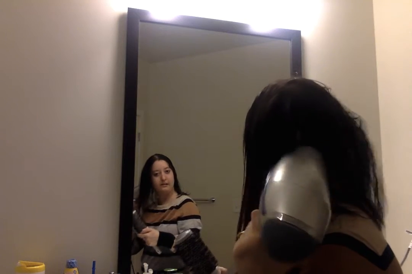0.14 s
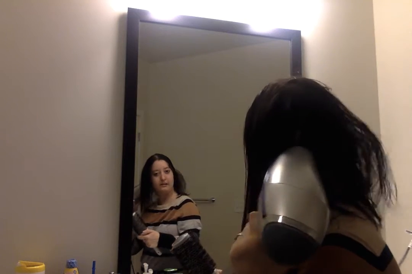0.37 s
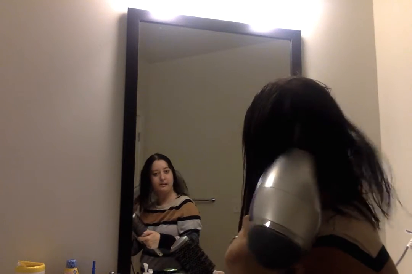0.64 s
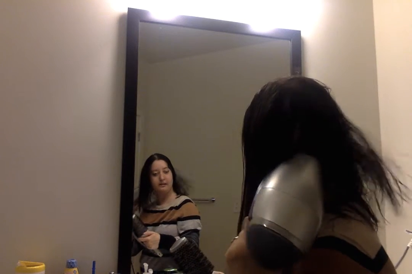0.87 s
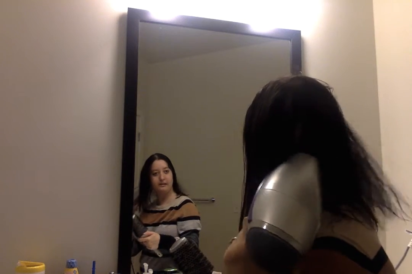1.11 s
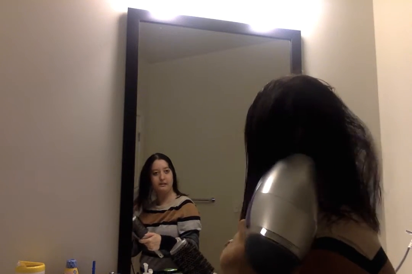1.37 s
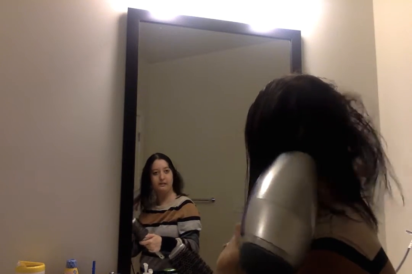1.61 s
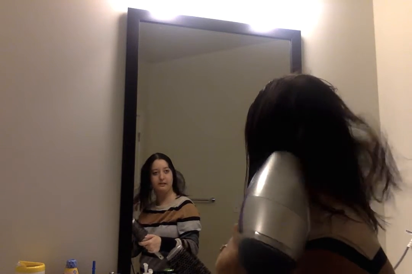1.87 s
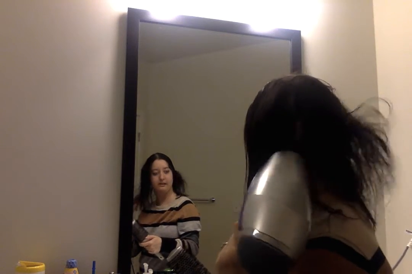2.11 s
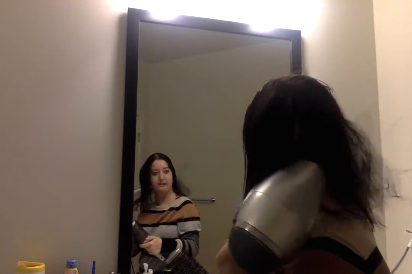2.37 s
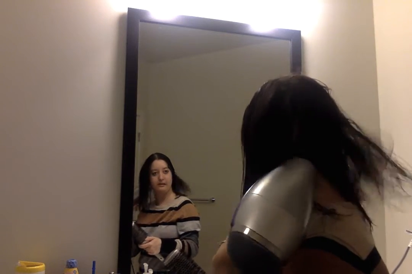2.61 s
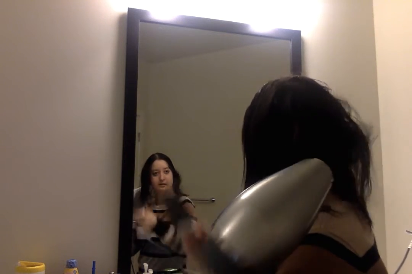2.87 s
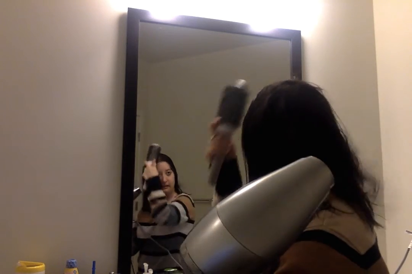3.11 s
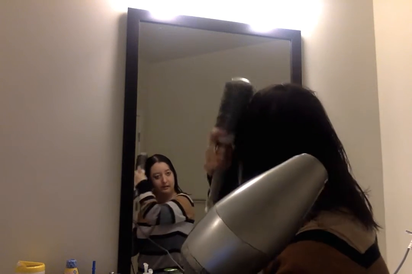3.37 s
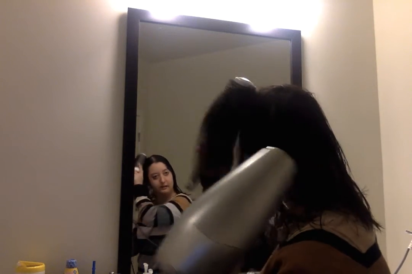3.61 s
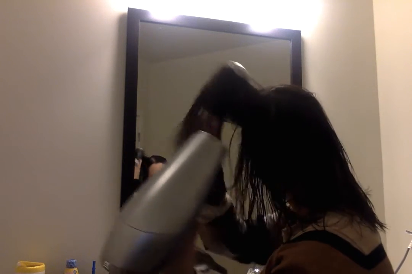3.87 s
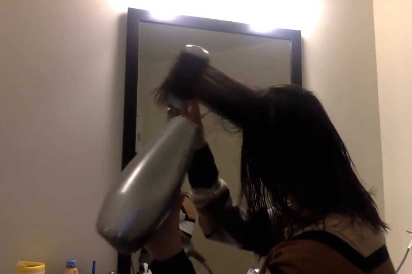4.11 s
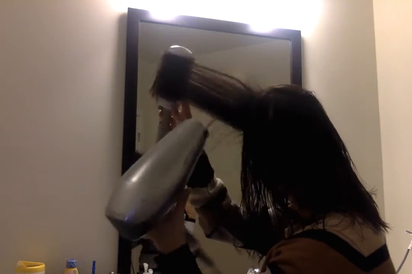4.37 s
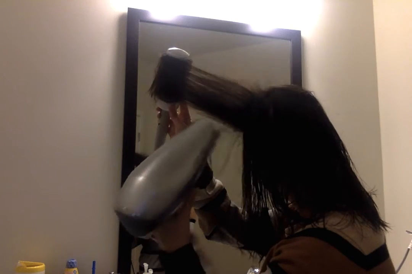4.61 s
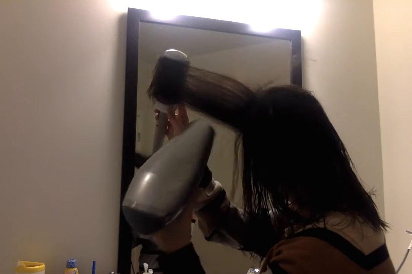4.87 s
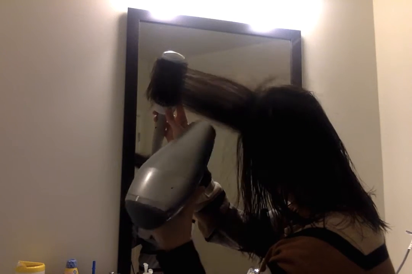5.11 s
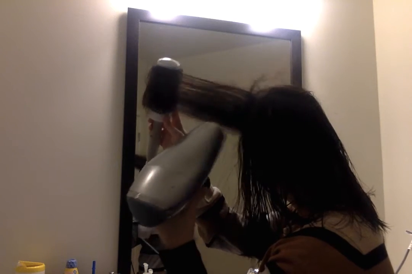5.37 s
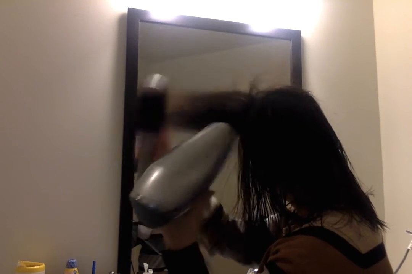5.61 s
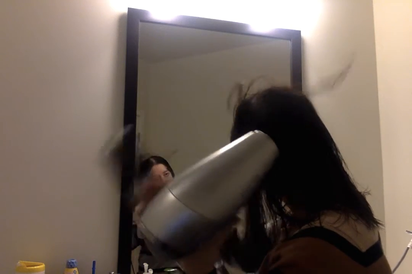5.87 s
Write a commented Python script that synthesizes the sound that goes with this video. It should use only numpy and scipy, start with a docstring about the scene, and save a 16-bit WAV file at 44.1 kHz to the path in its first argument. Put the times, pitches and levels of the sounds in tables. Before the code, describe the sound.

A hair dryer is already running at the start and never stops. Its dense, hissy air rush stays nearly level, with a faint fluttering whine underneath. Around three seconds it swings sideways, the rush lifts and the whine stands out for about a second, then recedes; near the end the motor pitch sinks slightly. Close microphone in a small hard bathroom.

```python
"""A hand-held hair dryer runs close to a small microphone in a bathroom and is moved about the head.
Its air is shaped noise, coloured by peaks and dips and tilted by where the nozzle points.
The motor is a stack of sines on multiples of the shaft speed, led by a whine at eight times that speed;
it throbs with the mains and sags near the end as hair and brush block the air.
The hard room lifts and cancels narrow low bands of the rush."""
import sys
import numpy as np
from scipy import signal
from scipy.fft import rfft, irfft, next_fast_len
from scipy.io import wavfile
from scipy.ndimage import uniform_filter1d

SR = 44100
rng = np.random.default_rng(int(sys.argv[2]) if len(sys.argv) > 2 else 0)


def volts(x):
    """Linear amplitude factor 10**(x/20) for a level x in dB, scalar or array-like."""
    e = np.asarray(x, float) / 20
    return 10 ** e


def wav_record(signal):
    """Record a signal, one row per channel, as 16-bit PCM in the file named by sys.argv[1]."""
    frames = np.transpose(np.atleast_2d(signal))
    bounded = np.clip(frames, -1, 1)
    # unit amplitude maps onto the largest positive 16-bit level
    quanta = np.round(bounded * 32767).astype(np.int16)
    wavfile.write(sys.argv[1], SR, quanta)


N = 263718
FRAME, HOP = 2048, 512  # samples, for the noise spectrum
MAINS_HZ = 60

# how far the dryer has swung side-on to the microphone: time_s, side_on (0-1)
SIDE_ON = [(0, 0.07), (1, 0.12), (2, 0), (2.8, 0.1), (3.2, 0.7), (3.6, 0.84), (4.3, 0.65), (5, 0.57),
           (5.5, 0.77), (5.98, 0.9)]


def evened(x):
    """Scales to rms 1."""
    return x / np.sqrt(np.mean(x ** 2) + 1e-20)


def read(points, hz):
    """A spectrum joined by straight lines on a log frequency axis."""
    point_hz, value = np.transpose(points)
    return np.interp(np.log(hz + 1), np.log(point_hz + 1), value)


def humps(modes, hz):
    """Sum of humps and dips in dB, each falling to half its dB at the edges of its width."""
    return sum(db / (1 + (2 * (hz - centre_hz) / width_hz) ** 2) for centre_hz, width_hz, db in modes)


def humps_by_aim(modes, hz):
    """Hump curves in dB with the dryer behind the head and with it at the side."""
    modes = np.array(modes)
    return humps(modes[:, [0, 1, 2]], hz), humps(modes[:, [0, 1, 3]], hz)


def wander(t, slow_hz, fast_hz):
    """Smooth random drift of rms 1: sines of random phase, the slower ones stronger."""
    coarse = np.arange(0, t[-1] + 1, 1 / 400)
    rates = np.geomspace(slow_hz, fast_hz, num=24)
    cycles = np.outer(coarse, rates) + rng.random(len(rates))
    waves = np.sin(2 * np.pi * cycles) / np.sqrt(rates)
    return np.interp(t, coarse, evened(waves.sum(axis=1)))


def side_on_at(t):
    """Swing of the dryer: 0 is behind the head, 1 fully side-on."""
    return np.clip(np.interp(t, *np.transpose(SIDE_ON)), 0, 1)


def room(x):
    """Standing waves lift and cancel narrow low bands; the pattern changes with the place of the dryer."""
    # peaks and nulls at the microphone: centre_hz, width_hz, behind_db, side_db
    room_modes = [(60, 6, 5, 5), (222, 25, -2, -1), (255, 10, -4, -3), (268, 8, 4, 3), (295, 12, 9, 11),
                  (318, 12, 5, 1), (355, 25, 3, 5), (378, 14, 4, 4), (398, 14, -6, -4), (417, 14, 5, 5),
                  (436, 9, 10, 8), (470, 22, -4, -2), (505, 30, -4, -3), (550, 12, -4, -2), (575, 40, 4, 2),
                  (605, 14, 2, 3), (660, 35, -5, -3), (686, 14, 5, 3), (702, 14, -4, -5), (725, 30, 3, 1),
                  (765, 14, 4, 11), (778, 12, -3, 0), (815, 12, -3, 0), (860, 16, 5, 5), (897, 18, -3, -4),
                  (940, 20, 4, 2), (987, 12, 5, 2), (1045, 30, 3, 3), (1100, 30, -5, -1), (1132, 16, 3, 0),
                  (1178, 22, 4, 3), (1238, 20, -4, 0)]
    size = next_fast_len(N + SR)
    hz, spectrum = np.fft.rfftfreq(size, 1 / SR), rfft(x, size)
    behind, side = (irfft(spectrum * volts(db), size)[:N] for db in humps_by_aim(room_modes, hz))
    side_on = side_on_at(np.arange(N) / SR)
    return (1 - side_on) * behind + side_on * side


def shaft_angle(waver=0.0009):
    """Angle of the motor shaft in radians, its speed trembling by waver (rms fraction)."""
    # speed before the tremble: time_s, shaft_hz
    shaft_speed = [(0, 207), (.8, 207.2), (1.05, 208.4), (1.45, 209.6), (1.9, 208.7), (2.6, 208.6),
                   (3.5, 209), (4.2, 208.2), (4.7, 207.2), (5.0, 205.3), (5.2, 202.8), (5.5, 200.2),
                   (5.98, 199.3)]
    t = np.arange(N) / SR
    shaft_hz = np.interp(t, *np.transpose(shaft_speed)) * (1 + waver * wander(t, 3.2, 40))
    return 2 * np.pi * np.cumsum(shaft_hz) / SR


def swelling(t, tone, resting_db):
    """Gain of a tone: its resting power plus a smooth arch for each swell."""
    # a tone swells while the moving dryer lines up its reflections: middle_s, length_s, peak_db, tone
    swells = [(0.02, 0.19, -56, "whine"), (0.235, 0.11, -54.5, "whine"), (0.457, .14, -62, "whine"),
              (0.683, 0.14, -54.5, "whine"), (1.084, 0.12, -54, "whine"), (1.42, .25, -60, "whine"),
              (1.604, 0.15, -53, "whine"), (1.803, 0.18, -59, "whine"), (2.18, 0.16, -61, "whine"),
              (4.783, .12, -55.5, "whine"), (4.95, 0.072, -54, "whine"), (5.073, .12, -58, "whine"),
              (5.153, 0.22, -53.5, "whine"), (5.35, 0.1, -57.5, "whine"), (5.58, 0.082, -62, "whine"),
              (5.7, .14, -59.5, "whine"), (0.01, 0.21, -57.5, "octave"), (.25, .12, -63, "octave"),
              (0.556, 0.4, -59.5, "octave"), (.8, 0.17, -61, "octave"), (1.044, 0.34, -53, "octave"),
              (1.34, .2, -53.5, "octave"), (1.75, 0.14, -58, "octave"), (1.925, 0.14, -57, "octave"),
              (2.41, 1.07, -55.5, "octave"), (2.356, 0.068, -50.5, "octave"),
              (2.986, 0.098, -53.5, "octave"), (3.35, 0.71, -62, "octave"), (3.955, 0.15, -53, "octave"),
              (4.244, 0.12, -57, "octave"), (4.545, .4, -60, "octave"), (4.85, .4, -66, "octave"),
              (5.25, .3, -66, "octave"), (5.393, 0.083, -57, "octave"), (5.465, 0.13, -59, "octave"),
              (5.8, 0.6, -62.5, "octave"), (.35, 1.06, -68, "hum"), (0.965, 0.28, -67.5, "hum"),
              (2.5, 0.8, -73.5, "hum"), (3.35, 0.95, -73, "hum"), (4.0, 0.91, -70.5, "hum"),
              (4.65, 1, -79.5, "hum"), (5.245, 0.57, -72, "hum"), (5.753, .6, -76, "hum"),
              (0.122, 0.11, -58, "whistle"), (0.452, 1.6, -66.5, "whistle"), (1.25, 0.23, -62, "whistle"),
              (.55, .2, -62, "whistle"), (1.55, 0.65, -68, "whistle"), (2.35, 0.84, -67, "whistle"),
              (3.06, .1, -61, "whistle"), (3.33, 0.74, -62, "whistle"), (3.75, .15, -65, "whistle"),
              (4.1, .2, -65, "whistle"), (4.8, 1.2, -68, "whistle"), (.25, 0.59, -74, "low hum"),
              (1.1, .8, -75, "low hum"), (2.45, 1.2, -69.5, "low hum")]
    power = volts(resting_db + 0 * t) ** 2
    for middle_s, length_s, peak_db, name in swells:
        if name == tone:
            place = np.clip((t - middle_s) / length_s, -0.5, 0.5)
            power = power + (volts(peak_db) * np.cos(np.pi * place)) ** 2
    return np.sqrt(power)


def motor(angle, flutter_db=1.8, fade_db=2.5, steady_db=-57.5):
    """Sines on shaft multiples; mains ripple gives side tones, moving through room reflections fades them."""
    # whine between swells, strongest when the intake faces the microphone: time_s, level_db
    whine_level = [(0, -64), (.5, -61), (1.5, -62.5), (2.3, -61.5), (2.74, -65.5), (2.84, -57), (2.95, -55),
                   (3.06, -51), (3.13, -46), (3.24, -50.5), (3.37, -47), (3.5, -48.5), (3.75, -50),
                   (4.08, -46.5), (4.2, -56.5), (4.52, -69.5), (4.75, -60.5), (5.0, -59.5), (5.5, -63.5),
                   (5.98, -62.5)]
    # the other main tones between swells: name to level_db
    resting_levels = {"octave": -66, "hum": -84, "whistle": -78, "low hum": -82}
    # whine, octave, hum, whistle and low hum: multiple of shaft speed
    main_multiples = [8, 16, 3, 24, 4]
    # the same five: strength of each mains side tone (share of the tone)
    main_throb = [.04, .15, .02, .3, .02]
    # the same five: chance fading when weak (rms dB)
    main_fade = [2.4, 2.2, 1, 1.2, 1]
    # weaker tones: shaft_multiple, level_db, side_tone_share, share of the whine's slow swell
    shaft_tones = [(1, -84.5, 0, -0.1), (2, -82.5, 0.8, 0.34), (7, -72.5, 0, -1.2), (9, -77, 0.3, 0.9),
                   (12, -69.5, 0, 0.25), (28, -90, 0.5, -0.44), (32, -81.5, 1, 0.63), (35, -83, 0, 0.83),
                   (36, -90, 0.7, .2), (40, -85, 0.1, -0.45), (43, -99, 0, 0.2), (44, -89, 0.3, 0.71),
                   (48, -95, 0.1, -0.53), (52, -87, .2, .8), (56, -89, 0.6, -0.8), (60, -101, 0, 0.6),
                   (64, -100, 0.3, 0.31)]

    t = np.arange(N) / SR
    mains = np.cos(2 * np.pi * MAINS_HZ * t)
    whine_db = np.interp(t, *np.transpose(whine_level))
    levels = [swelling(t, "whine", whine_db)]
    levels += [swelling(t, name, db) for name, db in resting_levels.items()]
    out = np.zeros(N)
    for multiple, level, throb, tone_fade_db in zip(main_multiples, levels, main_throb, main_fade):
        # a tone louder than steady_db comes straight from the dryer and hardly fades
        reflected = 1 / (1 + (level / volts(steady_db)) ** 2)
        flutter = flutter_db * wander(t, 9.0, 65)
        fading = tone_fade_db * reflected * wander(t, 3.6, 12)
        out += level * volts(flutter + fading) * (1 + 2 * throb * mains) * np.sin(multiple * angle)

    # weaker tones follow the facing of the intake by their own share
    facing_db = uniform_filter1d(whine_db, size=SR // 2) - np.mean(whine_db)
    for multiple, db, throb, follow in shaft_tones:
        gain = volts(db + follow * facing_db + fade_db * wander(t, 0.81, 13))
        phase = 2 * np.pi * rng.random()
        out += gain * (1 + 2 * throb * mains) * np.sin(multiple * angle + phase)
    return np.sqrt(2) * out  # levels are rms


def swing_ridge(t, hz):
    """Lift in dB: in the swing a reflection raises one ridge, sliding down as its path grows."""
    # start_s (the ridge begins half a frame later), length_s, from_hz, to_hz, width_hz, lift_db
    ridge = (2.83, .45, 1140, 540, 100, 6)
    start_s, length_s, from_hz, to_hz, width_hz, lift_db = ridge
    done = np.clip((t - FRAME / 2 / SR - start_s) / length_s, 0, 1)
    centre_hz = from_hz + (to_hz - from_hz) * done
    return lift_db * np.sin(np.pi * done) / (1 + (2 * (hz[:, None] - centre_hz) / width_hz) ** 2)


def rush_colour(side_on, hz):
    """Gain, frequency by time, of the rush: a broad spectrum with narrower peaks and dips."""
    # rush before the peaks and dips: freq_hz, relative density_db
    rush_spectrum = [(24, -70), (60, -49), (150, -25), (190, -25.5), (205, -16.5), (500, -17.5), (700, -13),
                     (1500, -11), (3000, -14), (5700, -12.5), (7150, -21), (9900, -20), (12900, -27.5),
                     (15700, -35)]
    # peaks and dips in the colour of the rush: centre_hz, width_hz, behind_db, side_db
    peaks_and_dips = [(650, 120, -1, 5.5), (1383, 213, 6, 6.5), (2013, 340, 8, 8), (2714, 218, 7, 6),
                      (2610, 108, 5, 0.5), (3330, 340, 2.5, 6.5), (3970, 1540, 7.5, 4.5),
                      (4600, 250, -3, 0.5), (4880, 210, -2, 2.5), (5690, 92, 0.5, 5.5),
                      (6674, 51, 9.5, 7.5), (7160, 310, -2.5, -1), (8250, 550, 5, -2), (9930, 620, 6, -4.5),
                      (11570, 260, 6, 0.5), (12600, 270, -1, 5), (12950, 460, -9, -2), (13300, 400, 6, 2),
                      (14000, 500, 5, 4), (14650, 300, -4, 2), (15150, 500, -1, 7)]
    behind_db, side_db = (db[:, None] for db in humps_by_aim(peaks_and_dips, hz))
    colour = volts(read(rush_spectrum, hz)[:, None] + (1 - side_on) * behind_db + side_on * side_db)
    middle = (hz > 1800) & (hz < 3150)  # this band keeps a constant power
    return colour / np.sqrt(4 * np.sum(colour[middle] ** 2, axis=0) / 3)


def aim_tilt(side_on, rush_db, hz, near_db=-50):
    """Tilt in dB, frequency by time, from where the nozzle points and how near it is."""
    # rumble, roar, rush, jet hiss, fizz, finest fizz:
    # centre_hz, behind_db, side_db (both at a rush of near_db), dB lost for each dB the rush gains
    aim = [(150, -1, -4.5, 2), (704, 0, -4, 1), (2330, 0, -1, 0), (4900, 1.66, -2.2, 0.17),
           (9140, 0.1, 1.7, 0.57), (13400, -1, -3.5, 0.8)]
    centre_hz, behind_db, side_db, lost = np.transpose(aim)[:, :, None]
    log_centres = np.log(centre_hz[:, 0])
    shares = np.array([np.interp(np.log(hz + 1), log_centres, row) for row in np.eye(len(aim))])
    return shares.T @ ((1 - side_on) * behind_db + side_on * side_db - lost * (rush_db - near_db))


def air(angle, patchy_db=0.5, ripple_db=2.0, gust_db=0.04, throb=0.011, chop=0.016, fizz_db=0.7, fizz_hz=9000):
    """Turbulent rush: noise shaped frame by frame and pulsed by mains and fan."""
    # nearness of the nozzle: time_s, relative rush level_db
    nearness = [(0, -51), (.5, -50.5), (1.3, -50), (2.3, -50), (2.9, -50), (3.25, -47.5), (3.75, -49),
                (4.05, -50), (4.8, -51), (5.3, -52), (5.98, -51.5)]
    frames, hz = N // HOP + 5, np.fft.rfftfreq(FRAME, 1 / SR)
    t = np.arange(frames) * HOP / SR
    real, imag, patches, ripple = rng.standard_normal((frames, len(hz), 4)).T
    patches = evened(uniform_filter1d(uniform_filter1d(patches, size=20, axis=0), size=7, axis=1))
    # reflections interfere in narrow ridges that shift slowly
    ripple = evened(uniform_filter1d(uniform_filter1d(ripple, size=2, axis=0), size=60, axis=1))

    rush_db = np.interp(t, *np.transpose(nearness))
    side_on = side_on_at(t)
    shape_db = aim_tilt(side_on, rush_db, hz) + patchy_db * patches + ripple_db * ripple
    shape_db += rush_db + swing_ridge(t, hz)
    # the hiss above about 9 kHz wavers a little at random, 3 to 12 times a second
    shape_db += fizz_db * wander(t, 3.0, 12) / (1 + (fizz_hz / (hz[:, None] + 1)) ** 4)
    spectrum = (real + 1j * imag) * rush_colour(side_on, hz) * volts(shape_db)
    rush = signal.istft(spectrum, nperseg=FRAME, noverlap=FRAME - HOP)[1][:N]

    # gusts, the mains ripple and each turn of the fan all pulse the flow
    t = np.arange(N) / SR
    pulse = 1 + throb * np.cos(2 * np.pi * MAINS_HZ * t) + chop * np.cos(angle)
    return rush * volts(gust_db * wander(t, 2.5, 30)) * pulse


def scene():
    """Rush through the room plus the motor; one microphone feeds both channels."""
    angle = shaft_angle()
    return np.tile(room(air(angle)) + motor(angle), (2, 1))


def low_pass(x):
    """Removes everything above the highest recorded frequency."""
    return signal.sosfilt(signal.butter(12, 15760, fs=SR, output="sos"), x)


def record(dry):
    """Delivers the finished mix."""
    return low_pass(dry)


dry = scene()
out = record(dry)
wav_record(out)
```